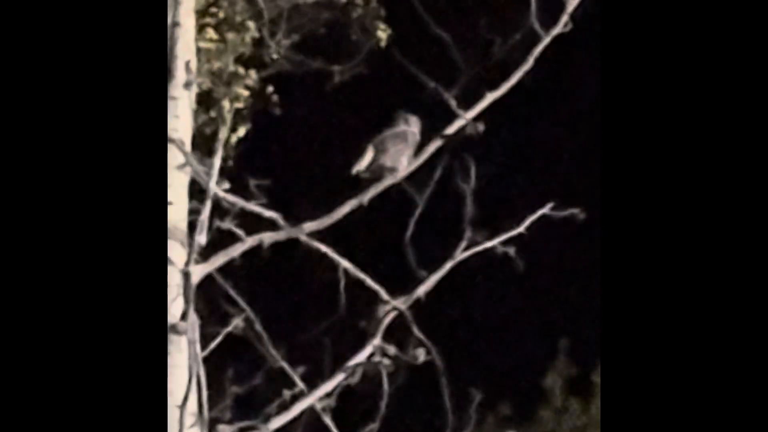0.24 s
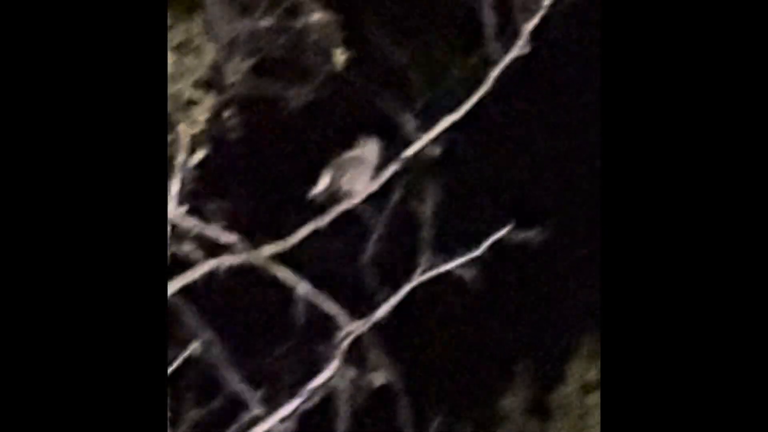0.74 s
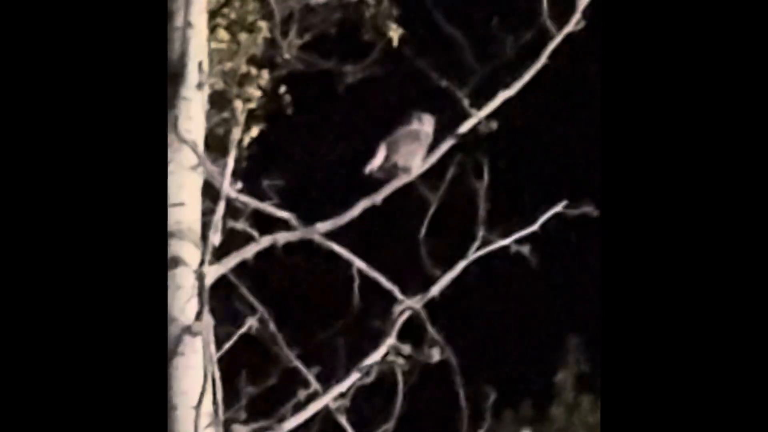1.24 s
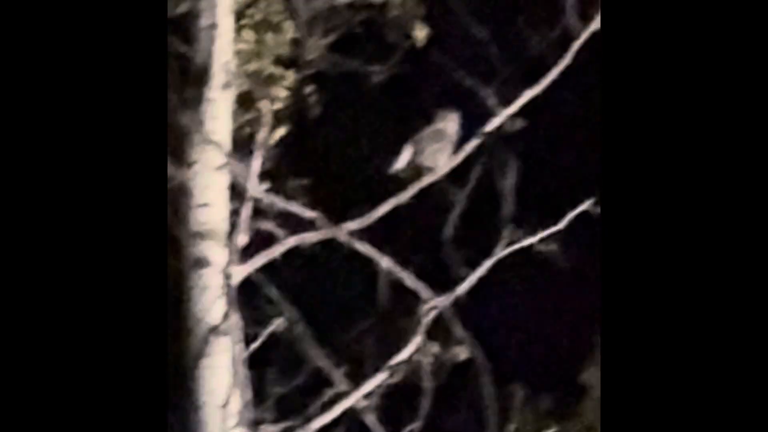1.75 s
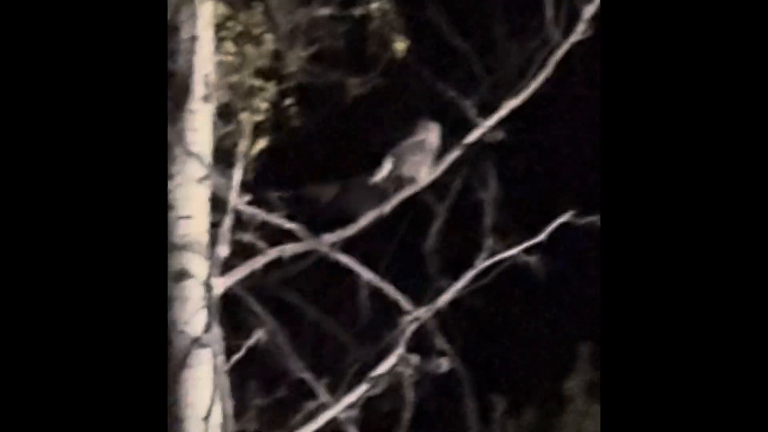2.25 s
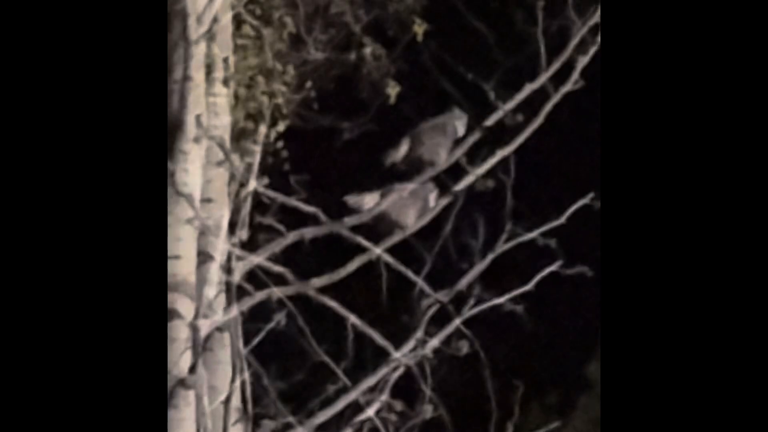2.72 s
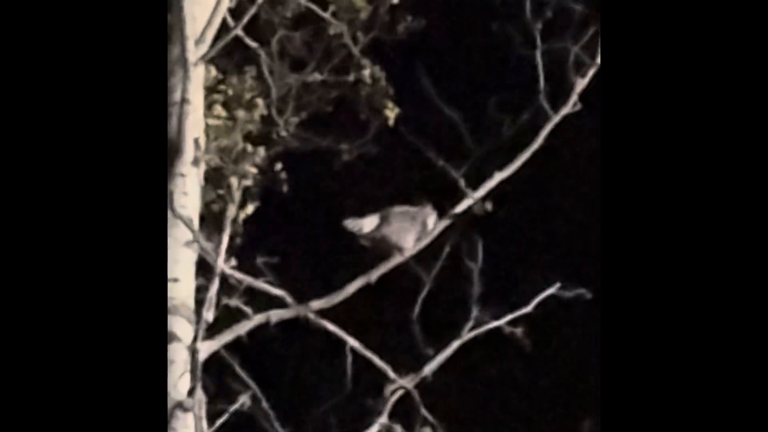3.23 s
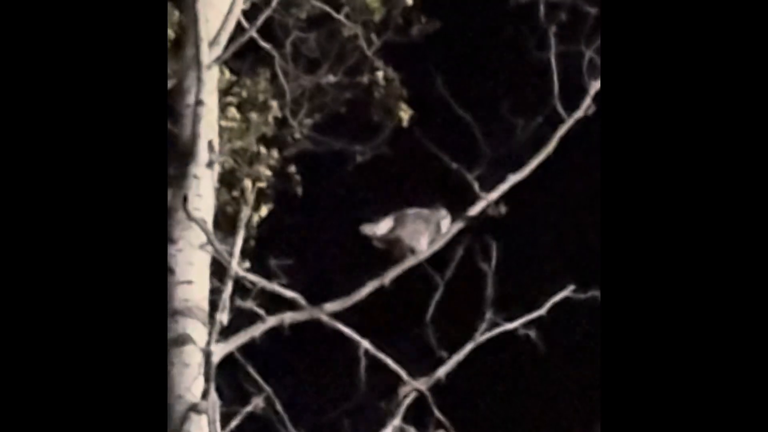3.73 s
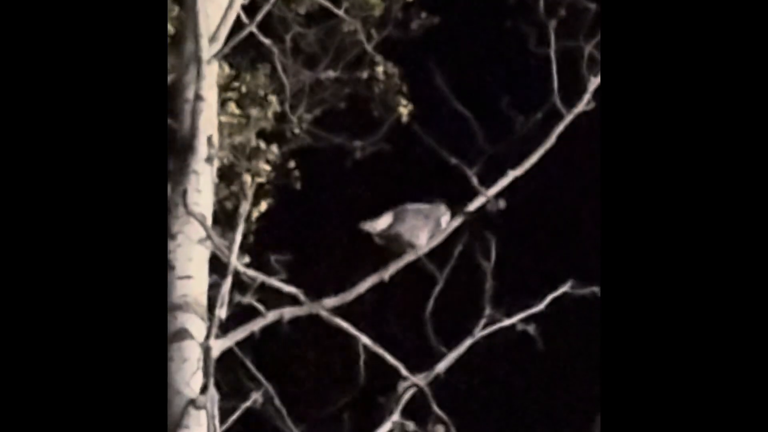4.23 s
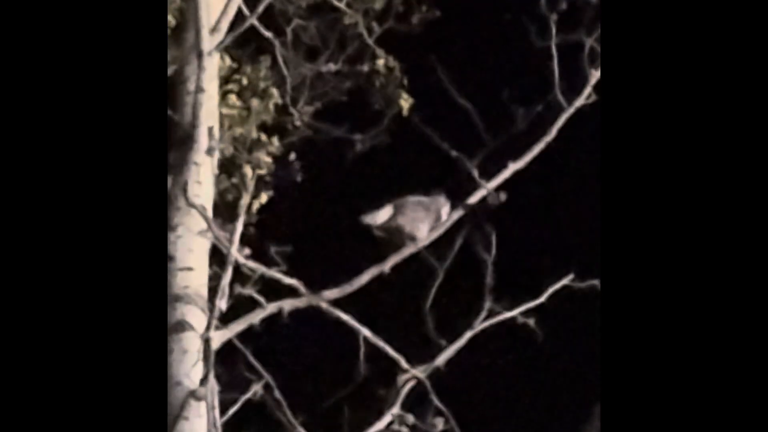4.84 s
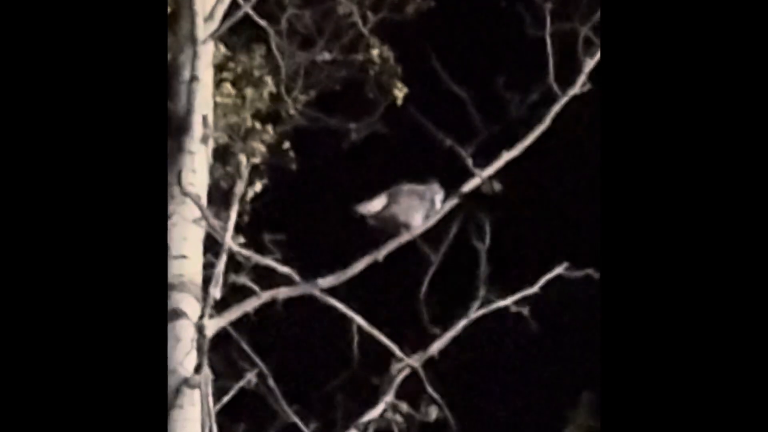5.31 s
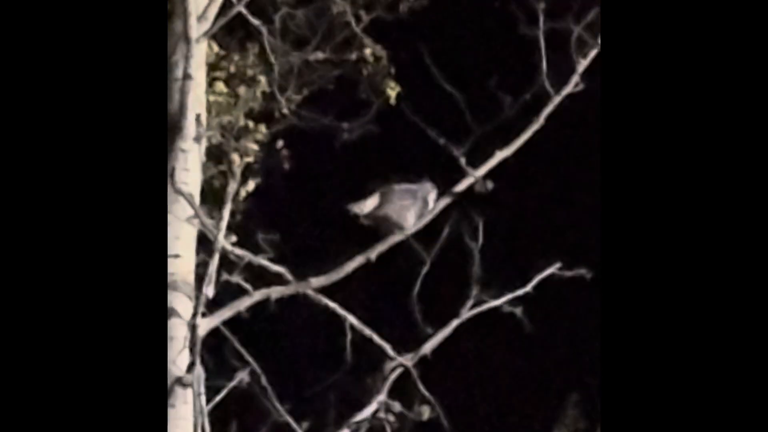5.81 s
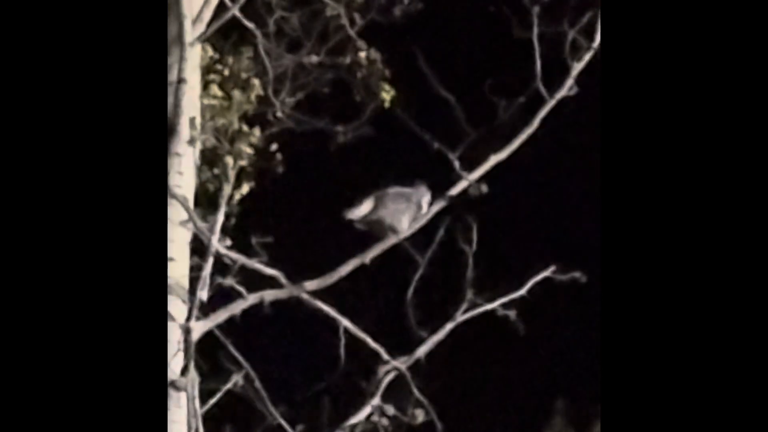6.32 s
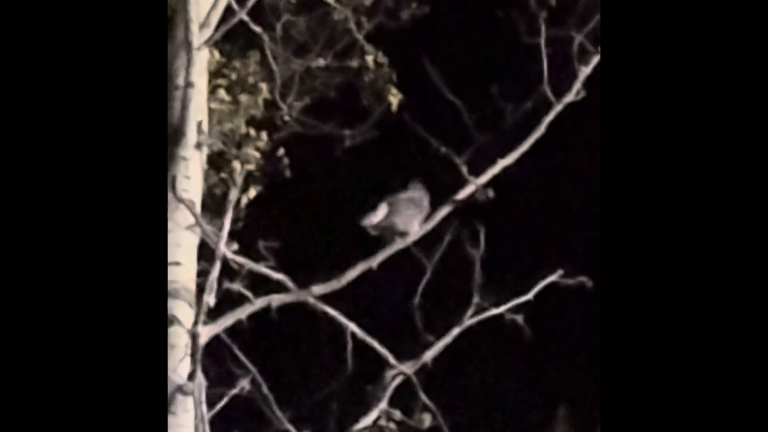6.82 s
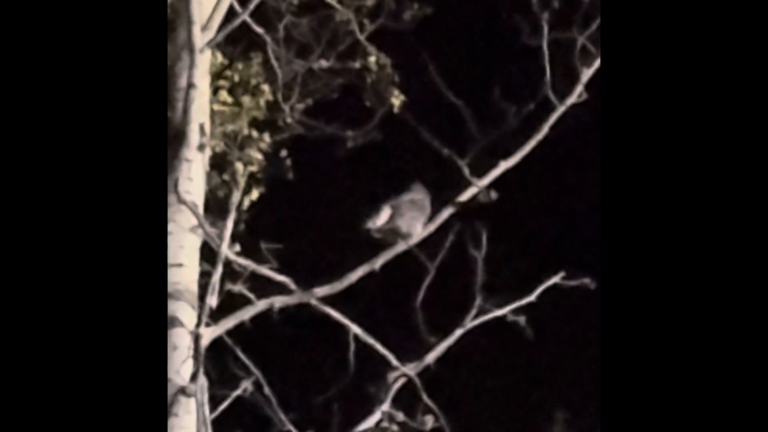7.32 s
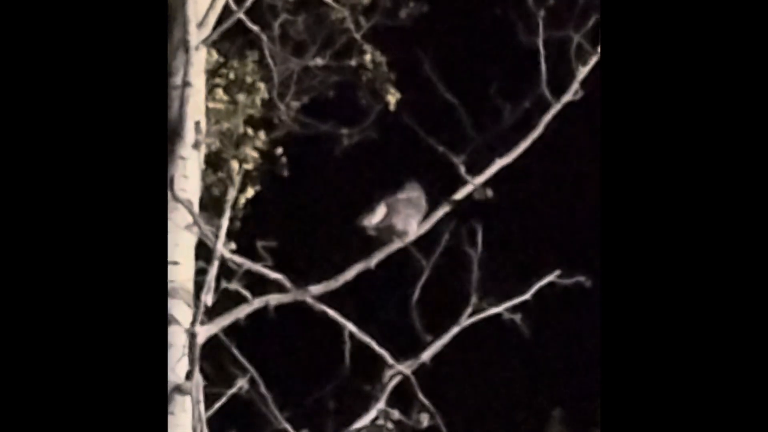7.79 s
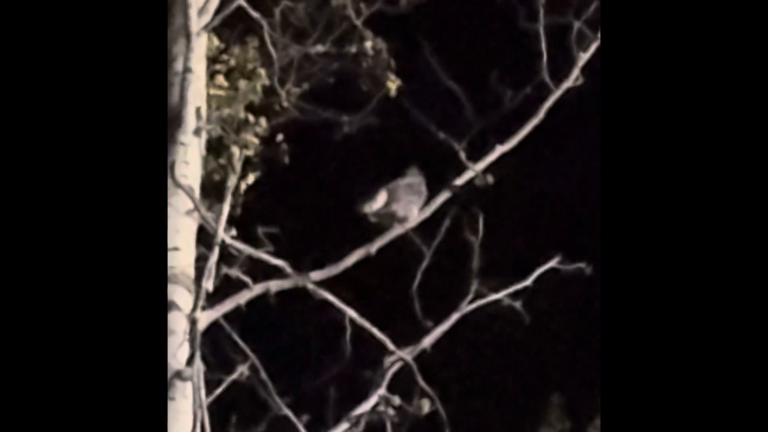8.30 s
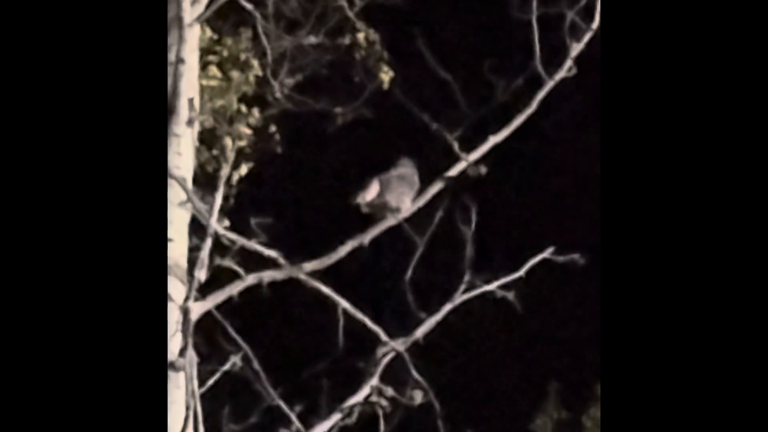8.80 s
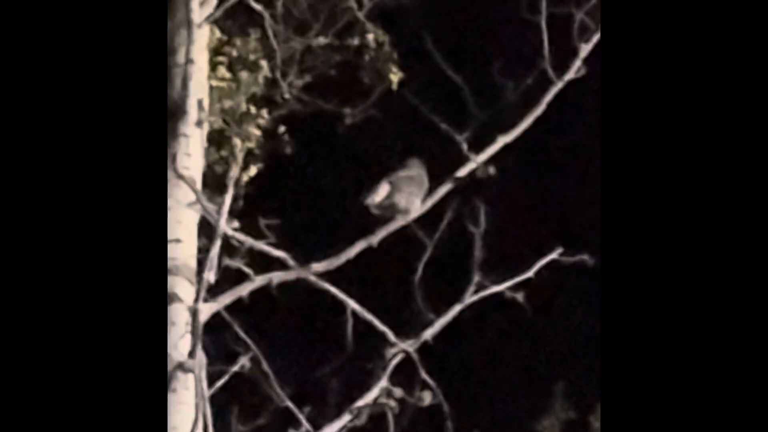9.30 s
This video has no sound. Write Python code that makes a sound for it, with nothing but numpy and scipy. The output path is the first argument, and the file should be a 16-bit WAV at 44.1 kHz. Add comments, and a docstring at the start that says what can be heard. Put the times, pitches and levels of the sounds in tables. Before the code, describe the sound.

Outdoors at night, several engines some way off make a deep bass drone, throbbing about four times a second. Weak hums, soft rumble and faint airy hush lie beneath. Early on, a tiny click near the hand-held microphone comes as the drone dips smoothly and resumes. Later a distant whirr swells faintly twice. The bird on the branch is not heard.

```python
"""A deep throb comes first: several engines outdoors at night, some way from a hand-held camera.
Four pure exhaust notes beat about four times a second; two nearly equal speeds deepen the throb every 3.5 s.
Weaker engine orders, noise rumble, wavering machine hums and the hush of the night air lie under it.
Decaying modes of the camera's case make one small click early in a dip in level, as the drone dissolves into
a later moment of the engines' beating. A far whirr, a narrow band of noise, swells twice after that."""
import sys
import numpy as np
from scipy import signal
from scipy.fft import rfft, irfft, next_fast_len
from scipy.io import wavfile

SR = 44100
rng = np.random.default_rng(int(sys.argv[2]) if len(sys.argv) > 2 else 0)


def persist_wave(psi):
    """Save psi, clipped to +-1, as 16-bit WAV."""
    counts = np.round(np.clip(psi, -1, 1) * 32767).astype(np.int16)
    wavfile.write(sys.argv[1], SR, np.atleast_2d(counts).T)


N = 421150
TIME = np.arange(N) / SR  # t/s
SIDES = np.array([[1], [-1]])  # sign for the left and right microphone ports

# Engines at governed speeds, nearest first: [firing rate f/Hz, level at the microphone before trim/dB]
ENGINE_NOTES = [(85.337, -28.1), (89.006, -33.3), (89.293, -35.6), (79.96, -40.4)]
# Weaker orders of the nearest engine: [multiple of its four-stroke cycle rate, level before trim/dB re its note]
CYCLE_ORDERS = [(2, -39), (4, -16), (5, -24.5), (7, -22), (12, -27), (15, -30), (24, -40), (30, -42.5),
                (48, -46.5)]
# Rumble of the machinery: [f/Hz, density before chug and swell/dB per Hz]
RUMBLE_SPECTRUM = [(12, -100), (24, -90), (32, -76), (43, -62.5), (60, -59), (105, -58), (135, -59.5),
                   (200, -66), (250, -68), (300, -72.5), (370, -72), (440, -84), (800, -105), (3000, -150)]
# Hums of the other machinery: [f/Hz, mean level before port balance/dB]
MACHINE_HUMS = [(50.6, -51), (61.9, -46), (68.3, -51.5), (81.2, -46), (119.9, -51.5), (134.4, -52),
                (180.5, -56), (302.8, -62), (384.6, -56), (410.8, -63), (620.8, -74.5), (981.4, -77),
                (1420.4, -75), (2493, -86), (8288, -100)]
# Hush of the night air: [f/Hz, density before trim/dB per Hz]
HUSH_SPECTRUM = [(100, -90), (400, -80.5), (720, -80), (1000, -83.5), (2000, -90), (2400, -93.5),
                 (3200, -96), (4000, -101.5), (4850, -106), (5200, -102), (6000, -108), (8200, -119.5),
                 (10500, -135), (15000, -150)]
# Modes of the camera's case: [f/Hz, starting level/dB, 60 dB decay t/s, phase between ports/rad]
CASE_MODES = [(400, -28, .012, 0), (1050, -27, .005, 2.5), (1900, -24.5, .0018, 0.5),
              (3660, -28, 0.0024, .3), (7150, -29.5, .0022, 1), (11500, -38, .0012, 2.5)]
# Far-off whirr: [start t/s, length t/s, level before fades and port balance/dB]
WHIRR_SWELLS = [(3.87, .88, -58.5), (6.2, .7, -63)]
# Likeness of the two microphone ports: [f/Hz, likeness, limited to 0-1 when used]
PORT_LIKENESS = [(150, 1.6), (200, 1.1), (340, 0.98), (490, 0.63), (800, 0.45), (1400, 0.5), (2000, 1.1),
                 (2600, 1.5), (4200, 1.5), (5000, .2), (5500, 2), (7000, 0.6), (8200, 0.4), (10500, .1)]
# Balance of the ports above the bass: [f/Hz, left minus right/dB]
PORT_BALANCE = [(200, -0.5), (340, -.9), (700, -3.4), (1400, -4.5), (2000, -2), (2600, 0.5)]

CYLINDERS = 6
IN_STEP_S = 5.5  # moment on the engines' clock when all the exhausts push together
CLICK_S = 2.461
DISSOLVE_S, DISSOLVE_LENGTH_S = 2.716, 0.89  # middle and length of the dissolve
SKIPPED_S = 27.534  # running time of the engines that the dissolve passes over
EARLY_HUSH_DB = -1.06  # the air is a little quieter before the dissolve
WHIRR_HZ, WHIRR_ARCH_HZ = 1120, 64.9  # pitch at the ends, and its rise in the middle
WHIRR_WIDTH_HZ, WHIRR_EDGE_S = 130, .1  # bandwidth, and length of each fade
MONO_HZ = 170  # well below this the waves are too long to tell the ports apart
EDGE_HZ = 15600  # upper band limit


def gain_of(db):
    """Convert decibels to amplitude."""
    return 10 ** (np.asarray(db) / 20)


def read(points, hz):
    """Read a table of frequency and value, joined on a log-frequency axis."""
    f, value = np.transpose(points)
    return np.interp(np.log(hz + 1), np.log(f + 1), value)


def drift(rate):
    """Slow random wander of rms 1: sines up to rate hertz, the slower ones stronger."""
    t = np.linspace(0, N / SR, 1000)
    speeds = np.geomspace(rate / 12, rate, 24)
    turns = np.outer(t, speeds) + rng.random(len(speeds))
    wave = (np.sin(2 * np.pi * turns) / np.sqrt(speeds)).sum(1)
    return np.interp(TIME, t, (wave - wave.mean()) / wave.std())


def ports(hz):
    """Likeness of the two ports, and the gain of each; both ports agree in the bass."""
    apart = 1 - 1 / (1 + (hz / MONO_HZ) ** 6)
    like = 1 - apart * (1 - np.clip(read(PORT_LIKENESS, hz), 0, 1))
    return like, gain_of(SIDES * apart * read(PORT_BALANCE, hz) / 2)


def diffuse(spectrum):
    """Noise from all around with the given density, part shared by the two ports and part opposed."""
    size = next_fast_len(N)
    hz = np.fft.rfftfreq(size, 1 / SR)
    shared, apart = rfft(rng.standard_normal((2, size)))
    like, balance = ports(hz)
    pair = shared * np.sqrt((1 + like) / 2) + SIDES * apart * np.sqrt((1 - like) / 2)
    shaped = pair * balance * gain_of(read(spectrum, hz))
    return irfft(shaped, size)[:, :N] * np.sqrt(SR / 2)  # density per Hz to samples


def firing(hz, clock):
    """Firing angle of an engine at a steady rate."""
    return 2 * np.pi * hz * (clock - IN_STEP_S)


def engines(clock, level_db=0.06):
    """Each exhaust is muffled to one pure firing note; together they beat."""
    notes = sum(gain_of(db) * np.cos(firing(hz, clock)) for hz, db in ENGINE_NOTES)
    return np.sqrt(2) * gain_of(level_db) * notes  # root 2 turns rms into peak


def lope(level_db=.1, waver_db=2.5):
    """Unequal cylinders of the nearest engine add weaker orders that waver on their way."""
    hz, note_db = ENGINE_NOTES[0]
    cycle, out = firing(hz, TIME) / CYLINDERS, np.zeros(N)
    for order, db in CYCLE_ORDERS:
        level = gain_of(db + waver_db * drift(2))
        out += level * np.cos(round(order) * cycle + 2 * np.pi * rng.random())
    return np.sqrt(2) * gain_of(level_db + note_db) * out


def rumble(chug=.2, swell_db=0.67):
    """Turbulent exhaust gas, a little stronger at each firing of the nearest engine."""
    pulses = 1 + chug * np.cos(firing(ENGINE_NOTES[0][0], TIME))
    return diffuse(RUMBLE_SPECTRUM) * pulses * gain_of(swell_db * drift(6))


def hums(waver_db=1.3, sway=.3):
    """Shafts and fans hum; moving air sways each tone, and the higher ones reach the ports out of step."""
    out = np.zeros((2, N))
    for hz, db in MACHINE_HUMS:
        angle = 2 * np.pi * (hz * TIME + rng.random()) + sway * drift(1.5)  # sway in rad
        like, balance = ports(hz)
        size = np.sqrt(2) * balance * gain_of(db + waver_db * drift(2))
        out += size * np.cos(angle + SIDES * np.arccos(like) / 2)
    return out


def hush(level_db=-0.24, flutter_db=0.27):
    """The night air: a smooth far-off wash of noise that flutters slightly."""
    return diffuse(HUSH_SPECTRUM) * gain_of(level_db + flutter_db * drift(10))


def click(contact_s=.00012):
    """One light knock rings the camera's case for a few milliseconds; modes shake the ports out of step."""
    t = np.maximum(TIME - CLICK_S, 0)
    ring = np.zeros((2, N))
    for hz, db, t60, lead in CASE_MODES:
        decay = gain_of(db - 60 * t / t60)
        ring += decay * np.sin(2 * np.pi * hz * t + SIDES * lead / 2)
    return ring * (1 - np.exp(-t / contact_s))


def whirr(start, length, db):
    """A narrow band of noise fades in, arches a little in pitch and fades out."""
    during = (TIME > start) & (TIME < start + length)
    age, out = TIME[during] - start, np.zeros((2, N))
    hz = WHIRR_HZ + WHIRR_ARCH_HZ * np.sin(np.pi * age / length)
    smooth = signal.butter(2, WHIRR_WIDTH_HZ / 2, fs=SR, output="sos")
    # two slow noises carried in quadrature make a band around the moving pitch
    a, b = signal.sosfilt(smooth, rng.standard_normal((2, N))[:, during])
    like, balance = ports(WHIRR_HZ)
    angle = 2 * np.pi * np.cumsum(hz) / SR + SIDES * np.arccos(like) / 2
    band = a * np.cos(angle) + b * np.sin(angle)
    swell = np.minimum(np.minimum(age, length - age) / WHIRR_EDGE_S, 1)
    out[:, during] = gain_of(db) * swell * balance * band / band.std()
    return out


def scene(fade_power=1.15, rumble_dip=.65):
    """The drone dissolves into a later moment: the level dips and the throb resumes out of step."""
    progress = np.clip((TIME - DISSOLVE_S) / DISSOLVE_LENGTH_S + .5, 0, 1)
    early, late = (1 - progress) ** fade_power, progress ** fade_power
    dip = np.hypot(early, late)  # unrelated noises add by power
    drone = early * engines(TIME - SKIPPED_S) + late * engines(TIME)
    machinery = (lope() + rumble() + hums()) * dip ** rumble_dip  # a shallower dip than the air
    air = hush() * dip * gain_of(EARLY_HUSH_DB * (1 - progress))
    far_whirr = sum(whirr(*row) for row in WHIRR_SWELLS)
    return drone + machinery + air + far_whirr + click()


def record(dry, whine_hz=9600, whine_db=-65):
    """A very faint high whine rises and falls with the drone; then a low-pass sets the band limit."""
    whining = dry * (1 + gain_of(whine_db) * np.cos(2 * np.pi * whine_hz * TIME))
    low_pass = signal.firwin(511, EDGE_HZ, window=("kaiser", 9), fs=SR)
    return signal.oaconvolve(whining, low_pass[None], "same")


dry = scene()
out = record(dry)
persist_wave(out)
```